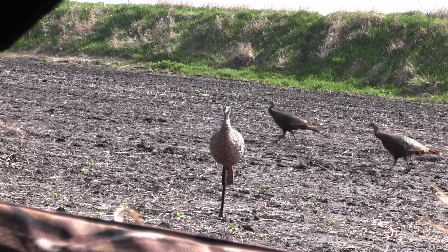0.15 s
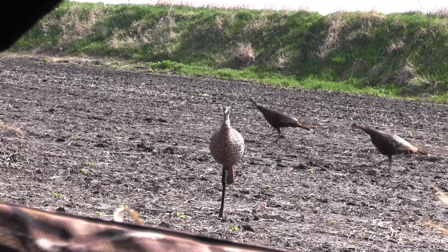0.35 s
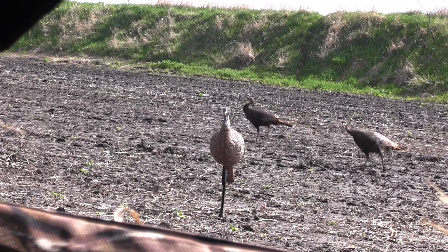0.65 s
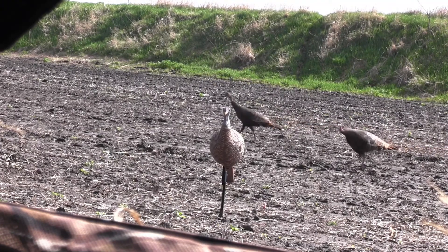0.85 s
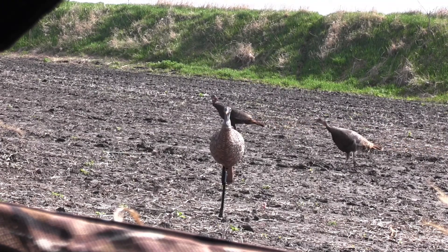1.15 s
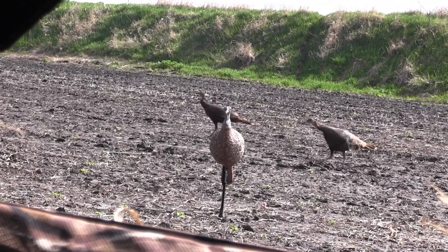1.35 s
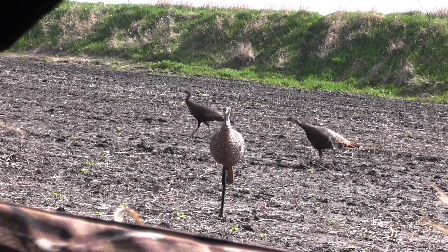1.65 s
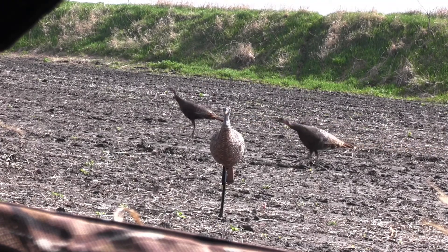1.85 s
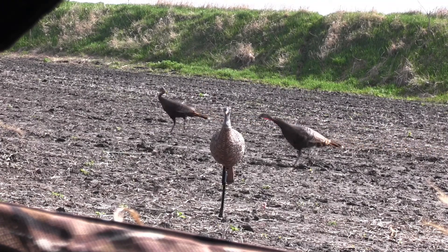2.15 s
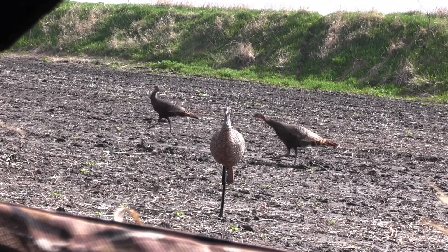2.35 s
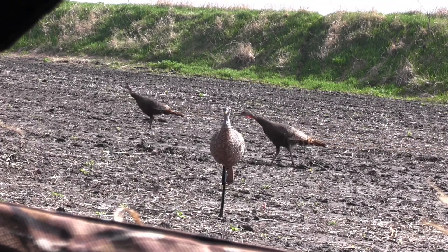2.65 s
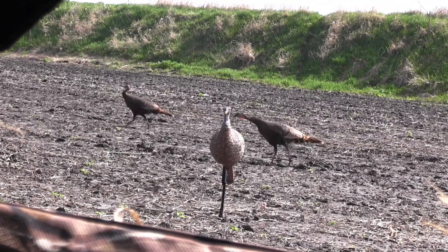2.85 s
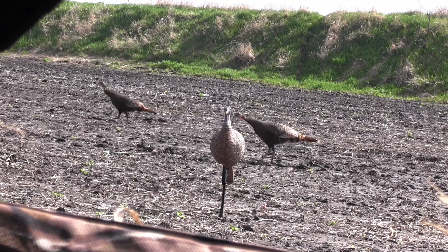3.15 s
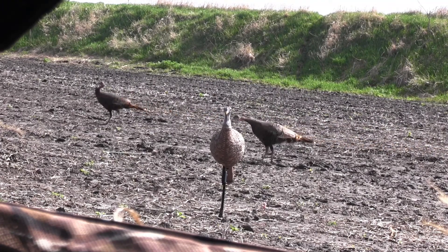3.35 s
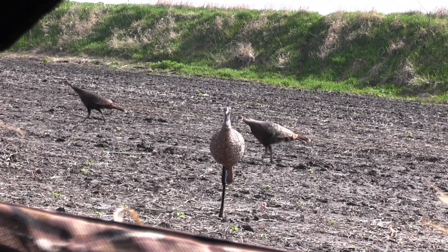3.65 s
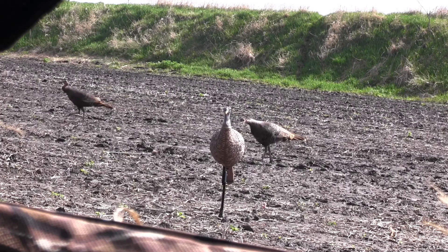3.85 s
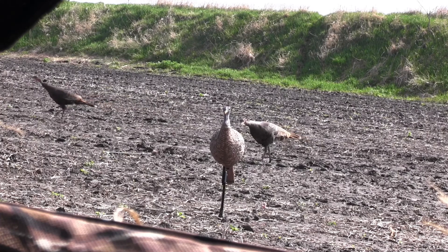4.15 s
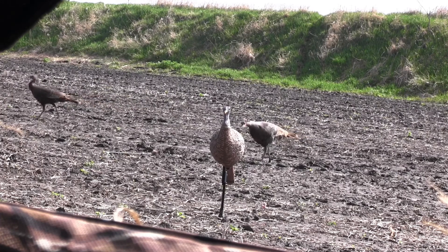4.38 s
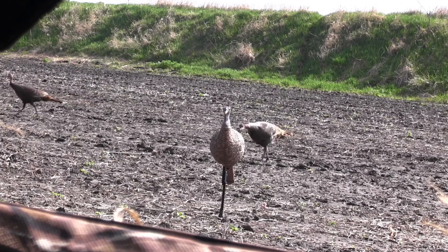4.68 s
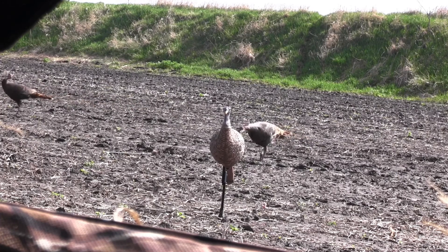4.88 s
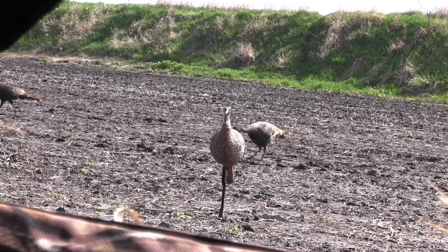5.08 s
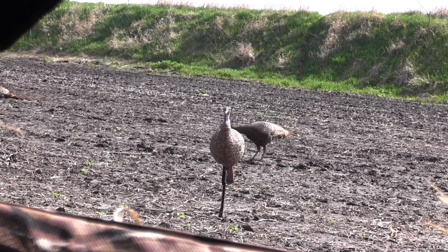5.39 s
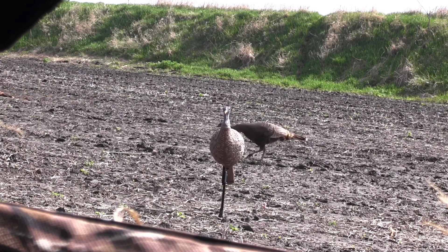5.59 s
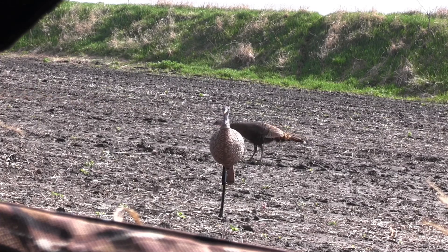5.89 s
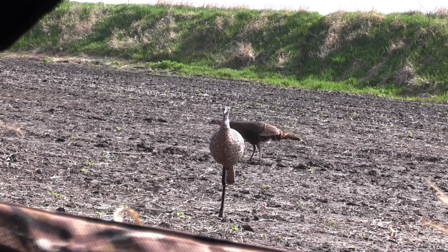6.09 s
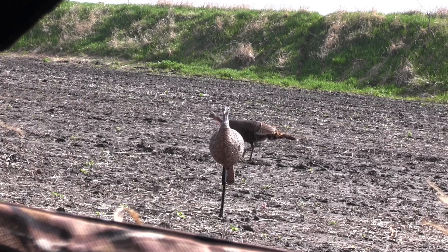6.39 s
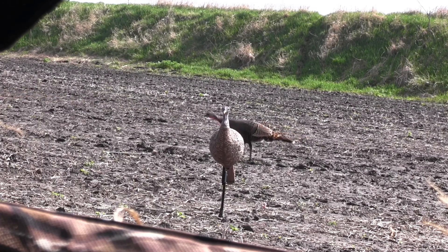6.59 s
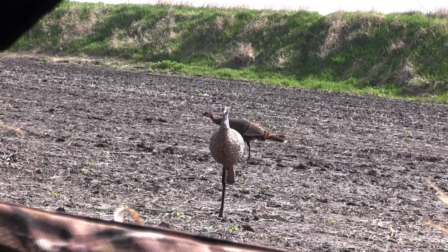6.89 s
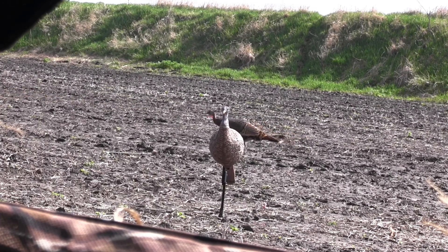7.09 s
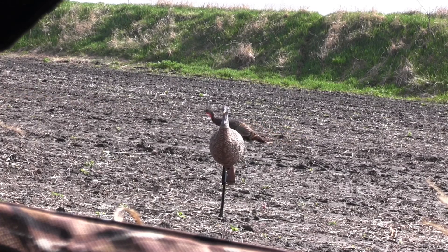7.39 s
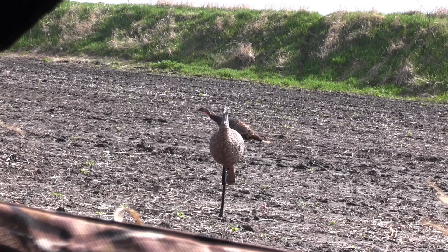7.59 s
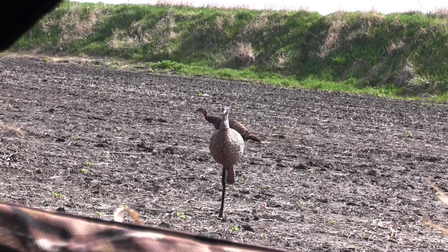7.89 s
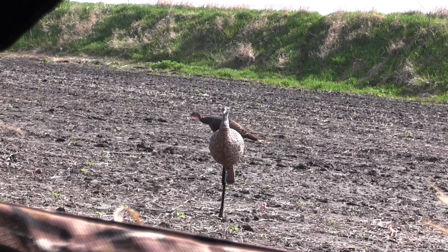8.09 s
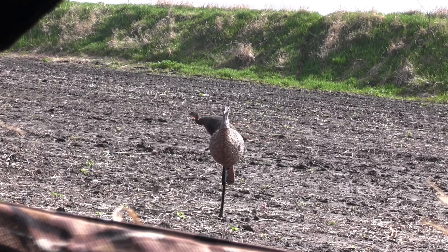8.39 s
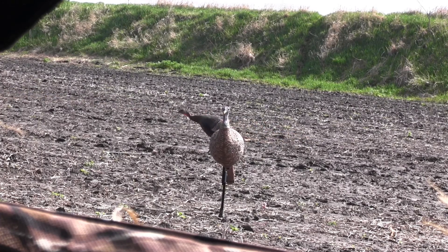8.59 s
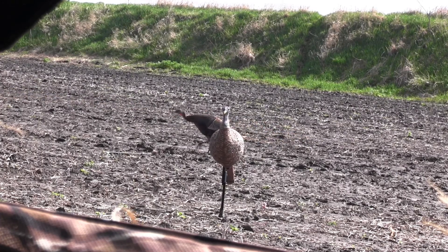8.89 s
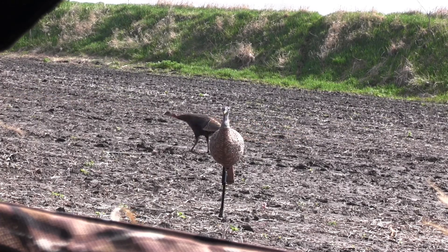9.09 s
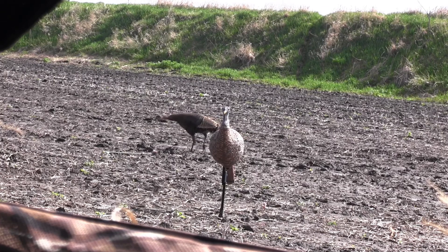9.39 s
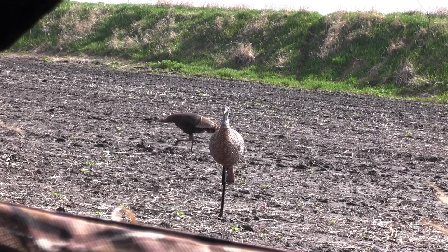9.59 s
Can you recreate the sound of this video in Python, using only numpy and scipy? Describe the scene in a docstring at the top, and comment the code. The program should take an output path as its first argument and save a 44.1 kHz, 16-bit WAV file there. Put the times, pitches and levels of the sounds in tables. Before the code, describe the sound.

For the first 5.6 seconds it is quiet inside a fabric ground blind: a low far drone swells gently, still air hisses faintly, and cloth rustles softly, most noticeably near 1.2 and 3.4 s. Small dry ticks of gear appear at 0.2, 1.6, around 2.1 and 3.35 s, with fainter dull taps from 4.4 to 5 s. At 5.6 s a close hen-turkey call begins, likely a hunter's reed: a weak, rough first yelp, a second at 5.9, then full loudness from 6.2 s. Fifteen yelps follow about 0.3 s apart, up to 9.7 s. Each opens on a thin note near 1,100 Hz, breaks quickly down to a nasal, bright tone near 700 Hz, and flips upward in a dying rasp. Breathy air leaks around the notes. A sharper tick hides among them at 8.8 s. Reflections are very short; the last yelp runs up to the end.

```python
"""Ticks of gear and a soft rustle of fabric come first, inside a ground blind, over a low, far drone.
From 5.6 s fifteen hen-turkey yelps sound close by, likely a hunter's reed call aimed at birds in the field.
Each yelp starts as a high thin note, breaks down into a full tone and ends in a rising rasp.
The yelps are summed harmonics with leaking-air noise; the ticks are decaying noise bursts.
Drone, rustle and still air are filtered noise; sparse echoes place calls and ticks between fabric walls."""
import sys
import numpy as np
from scipy import signal
from scipy.fft import rfft, irfft, next_fast_len
from scipy.io import wavfile
from scipy.ndimage import uniform_filter1d, minimum_filter1d

SR = 44100
rng = np.random.default_rng(int(sys.argv[2]) if len(sys.argv) > 2 else 0)


def wav_record(signal):
    """Record a signal, one row per channel, as 16-bit PCM in the file named by sys.argv[1]."""
    frames = np.transpose(np.atleast_2d(signal))
    bounded = np.clip(frames, -1, 1)
    # unit amplitude maps onto the largest positive 16-bit level
    quanta = np.round(bounded * 32767).astype(np.int16)
    wavfile.write(sys.argv[1], SR, quanta)


N = 429534

# Colour of the far drone: (frequency [Hz], relative level [dB])
DRONE_SPECTRUM = [(15, -48.5), (25, -17.5), (91, -4.5), (202, -10), (271, 0.5), (330, -1), (494, -13),
                  (545, -19.5), (700, -34.5), (910, -48.5), (1540, -120)]
# Swell of the drone before its trim: (time [s], level [dB])
DRONE_SWELL = [(0, -55.5), (1.1, -49.5), (2.3, -47.5), (2.85, -44.5), (3.2, -49), (4.3, -49.5), (4.7, -47),
               (5.6, -50), (6.5, -49.5), (7.2, -54.5), (8.5, -53.5), (9.74, -46.5)]
# Colour of the still air: (frequency [Hz], relative level [dB])
AIR_SPECTRUM = [(350, -27.5), (600, -1), (929, -8.5), (7430, -18.5), (13700, -23.5), (15800, -34)]
# Swell of the soft rustle before its trim: (time [s], level [dB])
RUSTLE_SWELL = [(.2, -60), (.6, -56.5), (1.25, -52.5), (1.5, -58.5), (3.15, -59), (3.4, -51), (3.95, -53.5),
                (4.25, -63.5), (5.3, -55.5), (6.5, -52), (7.7, -57.5)]
# Colour of the rustle: (frequency [Hz], relative level [dB])
RUSTLE_SPECTRUM = [(600, -2.5), (2200, 0), (3200, -7), (5500, -11), (6300, -6), (7300, -11.5),
                   (15000, -17.5)]
# Ticks and knocks of gear, levels before the trim:
# (time [s], level [dB], body colour [dB], treble colour [dB], top colour [dB])
TICK_EVENTS = [(0.166, -33, -13, -15.5, -12), (1.585, -36, -11, -21, -4), (1.594, -26.5, -10, -20.5, 6.5),
               (1.797, -43.5, -12, -20, -24), (2.091, -36.5, -10, -23, -18), (2.11, -34.5, -5.5, -16, -17),
               (2.146, -34, -16, -21, -34), (2.709, -38.5, -1, -19, -30), (2.919, -42.5, -12, -15, -3),
               (3.132, -45, -12, -22, -26), (3.353, -25, -16, -9.5, -5), (3.389, -37.5, -15, -12, -8),
               (4.432, -43, 4, -34, -40), (4.582, -42.5, -7, -28, -38), (4.656, -44, -17, -19, -14),
               (4.953, -38, 6, -48, -50), (8.767, -16.5, -11, -21.5, -22)]
# Colour all ticks share: (frequency [Hz], relative level [dB])
GEAR_SPECTRUM = [(300, -7), (850, 5.5), (1400, 0), (2050, 7), (3800, 3), (6600, 4.5), (15500, -15)]
# Reverberation of the blind: (frequency [Hz], time to fall by 60 dB [s])
BLIND_DECAY = [(300, 0.083), (10000, 0.095)]
# One row per yelp: (start [s], opening pitch [Hz], bottom of the pitch bowl [Hz], fall time [s],
# bowl bottom after start [s], hold [s], relative effort [dB], sag over the hold [dB], brightness [dB])
YELP_EVENTS = [(5.604, 926, 657.6, 0.021, 0.046, 0.071, -19, 9.5, -14.5),
               (5.901, 963, 824, 0.021, 0.045, 0.06, -5.5, -11.5, -15),
               (6.171, 991, 714, 0.0041, 0.097, 0.092, -0.5, 3, -1.9),
               (6.457, 1029, 684.5, 0.015, 0.081, 0.11, -4, -3.5, 0.5),
               (6.753, 1076, 693.7, 0.012, 0.07, 0.11, -2.5, 2.5, 0.5),
               (7.045, 1098, 674, 0.01, 0.066, 0.12, -2.5, 8.5, 3.5),
               (7.346, 1130, 726.2, 0.0082, 0.053, 0.1, -3.5, 2.6, 2),
               (7.641, 1093, 721.4, 0.01, 0.03, 0.1, -3.5, 0.3, 3),
               (7.946, 1084, 703.4, 0.0081, 0.042, 0.089, -1.5, 2.7, 4),
               (8.248, 1088, 703.2, 0.0087, 0.048, 0.092, -2.5, 4, 2.5),
               (8.546, 1118, 720, 0.0115, 0.058, 0.1, -2.5, 3, 2),
               (8.843, 1114, 701.6, 0.0088, 0.053, 0.1, -4, 3.5, 1.3),
               (9.126, 1109, 708, 0.0066, 0.056, 0.1, -3.5, 2, 3.5),
               (9.418, 1082, 710, 0.0078, 0.055, 0.1, -2.2, 5.5, -1),
               (9.707, 1042, 691.4, 0.0061, 0.053, 0.098, -5.5, -9, -0.5)]
# Mouth resonances, before their stretch: (frequency [Hz], relative level [dB])
MOUTH_RESONANCES = [(1250, -6), (1450, 5.5), (1800, 13.5), (2150, 8.5), (2400, 0), (2700, -27), (2950, -16),
                    (3400, -42.5), (4300, -53), (5200, -33), (7200, -37), (8300, -52.5), (10000, -42),
                    (12000, -59.5)]
# Strength of the fundamental by its pitch: (frequency [Hz], relative level [dB])
FUNDAMENTAL_RESPONSE = [(650, -16.5), (720, 0), (780, -5), (860, -7), (1000, -4.5), (1150, 0.5)]
# Partials lean left or right by frequency: (frequency [Hz], left minus right [dB])
SIDE_LEAN = [(680, 13.5), (730, 6.5), (800, 8.5), (920, -8.5), (1000, 13), (1355, -2), (1400, -7),
             (1450, 0), (1630, -4.5), (1820, 0), (2030, 13.5), (2120, 1.5), (2180, 6), (5500, 7.5),
             (8000, 4.5)]
# Standing waves in the blind thin out partials as they slide by: (frequency [Hz], gain [dB])
STANDING_WAVES = [(680, -2), (730, -1), (850, -7), (1000, -1.5), (1355, -1), (1395, -12), (1450, -4.5),
                  (1560, -17.5), (1820, -5), (2030, -10.5), (2120, -5.5), (2170, -6.5), (2230, -5),
                  (2400, -6.5), (3000, -8.5), (7000, -4.5)]
# Air leaking past the reed, with a whistly resonance, before its stretch:
# (frequency [Hz], relative level [dB])
LEAK_SPECTRUM = [(700, -26), (2600, 11.5), (3900, -23.5), (5600, -17.5), (6900, -7), (7450, 8.5),
                 (8200, -12.5), (10000, -17), (12000, -28.5)]
# In the first yelps the reed swings strong and weak in turn, adding half tones: (time [s], depth [0-1])
DOUBLING_DEPTH = [(5.6, 0), (5.64, 0.9), (5.89, 0.063), (5.92, 0.028), (5.965, 0.4), (6.18, 0.14),
                  (6.21, 0), (6.25, .03)]
# Now and then the reed stumbles in mid-yelp: (time [s], length [s], dip [dB], roughness [0-1])
STUMBLE_EVENTS = [(6.222, 0.02, 9, 0.4), (6.538, 0.028, 9.5, 0.05), (6.83, .015, 8, .05),
                  (7.721, 0.0085, 4, 0.31)]
# Bolder calling changes the leak and sinks its whistle:
# (time [s], leak before effort [dB], stretch of the leak's spectrum [factor], highest partials [dB])
BOLDNESS_STAGES = [(5.6, -58, 1.25, -13.5), (6.2, -44.5, 1.3, -4), (6.6, -48, 1.05, 2.5),
                   (7.4, -41, 1.007, 2.5), (9.4, -43.5, 0.96, -1)]

EDGE_HZ = 15850  # top of the audible band
# Pitch: the opening note falls into a shallow bowl, then flips back up as the pressure is let go
BOWL_HZ_PER_S2 = 25000
FLIP_SHARE = .91  # of the opening pitch
FLIP_AFTER_S, FLIP_S = .011, 0.0081
# An opening note above this pitch glides only part of the way, then breaks to the full tone
BREAK_ABOVE_HZ, BREAK_S = 1055, 0.0011
BREAK_AT_FALLS, BREAK_SHARE, GLIDE_FALLS = 1.7, .75, 1.9  # times in units of the fall time
THIN_DB = -10.5  # the opening note has little fundamental
# Effort: a quick swell, a sagging hold, a drop at the release and a dying rasp
SWELL_DB_PER_S, LEAD_S = 4301.5, .012
DROP_DB, DROP_S = 19, .014
RASP_S, FADE_DB_PER_S, TAIL_S = .02, 859.5, .08
# Late in the hold the reed stops beating hard, and the yelp loses its brightness
DULL_AT_SHARE, DULL_OVER_SHARE = 0.66, 0.024
DULL_DB, DULL_TREBLE_DB = 11.5, 18
# The mouth starts out tighter and opens with boldness, by this power of the leak's stretch
MOUTH_STRETCH_POWER = 0.2
ROUGHNESS_HZ = 260  # speed of the reed's irregular wavering


def gain_of(db):
    """Turns decibels into amplitude."""
    return 10 ** (np.asarray(db) / 20)


def evened(x):
    """Scales a sound to rms 1."""
    return x / np.sqrt(np.mean(x ** 2) + 1e-20)


def read(points, hz):
    """Reads a table along a log-frequency axis."""
    f, value = np.transpose(points)
    return np.interp(np.log(hz + 1), np.log(f + 1), value)


def level(curve):
    """Turns a dB curve over time into a gain for every sample."""
    return gain_of(np.interp(np.arange(N) / SR, *np.transpose(curve)))


def step(t, width):
    """Steps smoothly from 0 to 1 around t = 0."""
    return .5 + .5 * np.tanh(t / width)


def add(mix, s, sound):
    """Mixes a stereo sound in at time s."""
    part = mix[:, round(s * SR):][:, :sound.shape[1]]
    part += sound[:, :part.shape[1]]


def colour(x, spectrum):
    """Filters a sound by a spectrum in dB."""
    size = x.shape[-1]
    gain = gain_of(read(spectrum, np.fft.rfftfreq(size, 1 / SR)))
    return irfft(rfft(x) * gain, size)


def wander(size, hz):
    """Smooth random motion of rms near 1: noise that falls off steeply above hz."""
    n = next_fast_len(size)
    rolloff = 1 + (np.fft.rfftfreq(n, 1 / SR) / hz) ** 4
    return evened(irfft(rfft(rng.standard_normal(n)) / rolloff, n)[:size])


def noise_pair(spectrum, side_db, size):
    """Coloured stereo noise: a common middle plus a quieter part of opposite sign left and right."""
    noise = rng.standard_normal((2, next_fast_len(size)))
    mid, side = colour(noise, spectrum)[:, :size]
    return evened(mid + gain_of(side_db) * np.array([side, -side]))


def far_drone(drone_db=1.0, rumble_db=-48):
    """A far drone of filtered noise swells and sinks; its rumble follows half as far in dB."""
    noise = noise_pair(DRONE_SPECTRUM, -16, size=N)
    rumble = signal.sosfiltfilt(signal.butter(2, 170, fs=SR, output="sos"), noise)
    swell = level(DRONE_SWELL)
    drone = gain_of(drone_db + 2 * wander(N, 12.0)) * swell * (noise - rumble)
    return drone + gain_of(rumble_db) * evened(np.sqrt(swell)) * rumble


def soft_rustle(rustle_db=-1, uneven_db=2.0):
    """Fabric rustles as filtered noise whose level wavers at random."""
    uneven = gain_of(rustle_db + uneven_db * wander(N, 10))
    return level(RUSTLE_SWELL) * uneven * noise_pair(RUSTLE_SPECTRUM, -3.5, size=N)


def still_air(air_db=-59):
    """Still air is a steady, faint hiss of filtered noise."""
    return gain_of(air_db) * noise_pair(AIR_SPECTRUM, -10, size=N)


def blind(x):
    """Fabric walls close by return a short tail of sparse reflections, different in each channel."""
    size = SR // 4
    signs = rng.choice([-1., 1.], (2, size))
    sparse = rng.random((2, size)) < 3000 / SR  # about 3000 reflections per second
    taps = signs * sparse * (np.arange(size) > .004 * SR)
    # each frequency dies at its own rate
    hz, t, z = signal.stft(taps, SR, nperseg=128)
    decay = gain_of(-60 * t / read(BLIND_DECAY, hz)[:, None])
    tail = signal.istft(z * decay, SR, nperseg=128)[1]
    tail = tail / np.linalg.norm(tail, axis=1, keepdims=True)
    return signal.oaconvolve(x, tail, axes=1)[:, :N]


def ticks(trim_db=-5, t60=0.086):
    """Each tick of gear is a noise burst with a sharp front, dull or bright, that dies quickly."""
    out = np.zeros((2, N))
    t = np.arange(SR // 5) / SR
    for s, db, body_db, treble_db, top_db in TICK_EVENTS:
        middle_db = (treble_db + top_db) / 2
        tint = [(1800, body_db), (6000, treble_db), (11000, middle_db), (15000, top_db)]
        burst = colour(noise_pair(GEAR_SPECTRUM, -5.5, size=len(t)), tint)
        add(out, s, evened(burst) * gain_of(db + trim_db - 60 * t / t60))
    return out


def opening(t, top_hz, fall_s, steepness=1.5):
    """How much of the high opening note is left, 1 to 0: a low one slides down, a high one breaks."""
    falls = np.maximum(t, 0) / fall_s
    if top_hz > BREAK_ABOVE_HZ:
        broken = step(t - BREAK_AT_FALLS * fall_s, BREAK_S)
        return np.exp(-falls / GLIDE_FALLS) * (1 - BREAK_SHARE * broken)
    return np.exp(-falls ** steepness)


def reed_pitch(t, high, top_hz, low_hz, bottom_s, hold_s):
    """The high note gives way to the full tone, which bends gently and flips up at the release."""
    bowl = low_hz + BOWL_HZ_PER_S2 * (t - bottom_s) ** 2
    hz = bowl + (top_hz - bowl) * high
    return hz + (FLIP_SHARE * top_hz - hz) * step(t - hold_s - FLIP_AFTER_S, FLIP_S)


def effort(t, hold_s, sag_db):
    """Swell, hold, drop and fade of one yelp's blowing effort, in dB."""
    held = SWELL_DB_PER_S * np.minimum(t, 0) - sag_db * np.clip(t / hold_s, 0, 1)
    fade = FADE_DB_PER_S * np.maximum(t - hold_s - RASP_S, 0)
    return held - DROP_DB * step(t - hold_s, DROP_S) - fade


def stumbling(s):
    """The dip in dB and the roughness that the reed's stumbles bring at times s."""
    at, length, dip_db, rough = np.transpose(STUMBLE_EVENTS)
    near = np.exp(-((s[:, None] - at) / length) ** 2)
    return near @ dip_db, near @ rough


def partial_heights(order, hz, db, high, dull, slide, bright_db, stretch, highs_db, knee_db=-19):
    """Amplitudes of the reed's harmonics, shaped by the mouth and by standing waves in the blind."""
    partial_hz = order * hz
    mouth_db = read(MOUTH_RESONANCES, partial_hz / stretch ** MOUTH_STRETCH_POWER)
    # brightness acts most on the third partial and less on each one above
    share = np.where(order > 2, gain_of(-4. * (order - 3)), 0)
    height = gain_of(mouth_db + share * (bright_db - DULL_DB * dull))
    height *= (order > 1) * (partial_hz < EDGE_HZ)
    height *= gain_of(db) / np.linalg.norm(height, axis=0)
    # the fifth partial and up weaken while the reed slides, and as it dulls
    height[4:] *= (1 - 0.5 * slide) * gain_of(highs_db - DULL_TREBLE_DB * dull)
    # the fundamental stops growing once the reed beats: more pressure only feeds the overtones
    fundamental = gain_of(db + read(FUNDAMENTAL_RESPONSE, hz) + THIN_DB * high)
    height[0] = fundamental / np.hypot(1, gain_of(db - knee_db))
    return height * gain_of(read(STANDING_WAVES, partial_hz))


def yelp(start, top_hz, low_hz, fall_s, bottom_s, hold_s, effort_db, sag_db, bright_db,
         unsettled=0.38, slack_rasp=1.0, firm_db=-18, lead_rad=.56, slide_leak=2.0, dull_leak_db=-3):
    """A reed's harmonics pass the mouth; it runs clean when settled, rough while it slides or is slack."""
    t = np.arange(-LEAD_S, hold_s + TAIL_S, 1 / SR)
    high = opening(t, top_hz, fall_s)
    hz = reed_pitch(t, high, top_hz, low_hz, bottom_s, hold_s)
    dip_db, stumble = stumbling(start + t)
    db = effort_db + effort(t, hold_s, sag_db) - dip_db
    # states of the reed, each from 0 to 1
    dull = step(t / hold_s - DULL_AT_SHARE, DULL_OVER_SHARE)
    slack = 1 / (1 + gain_of(db - effort_db - firm_db) ** 2)
    pitch_speed = uniform_filter1d(abs(np.gradient(np.log(hz), t)), size=500)
    slide = np.tanh(pitch_speed / 12) ** 2
    jitter = .001 + .014 * slide + .012 * slack + .012 * stumble
    hz = hz * (1 + jitter * wander(len(t), ROUGHNESS_HZ))

    stage_s, *stages = np.transpose(BOLDNESS_STAGES)
    leak_db, stretch, highs_db = (np.interp(start, stage_s, column) for column in stages)
    order = np.arange(1, 21)[:, None]
    height = partial_heights(order, hz, db, high, dull, slide, bright_db, stretch, highs_db)
    turns = np.cumsum(hz) / SR
    side = np.array([1, -1])[:, None, None]  # left, right
    pan = np.sqrt(2 / (1 + gain_of(-2 * side * read(SIDE_LEAN, order * hz))))
    # the overtones run ahead in phase on the left
    phase = 2 * np.pi * order * turns + side * (order > 1) * lead_rad / 2
    partials = np.sqrt(2) * pan * height * np.cos(phase)

    roughness = unsettled * slide + slack_rasp * slack + stumble
    rasp = roughness * wander(len(t), ROUGHNESS_HZ)
    # half the reed's rate: strong and weak swings in turn
    doubling = np.interp(start + t, *np.transpose(DOUBLING_DEPTH)) * np.cos(np.pi * turns)
    overtones = partials[:, 1:].sum(1) * (1 + rasp + doubling)
    tone = partials[:, 0] * (1 + rasp * slack / 2) + overtones

    # sliding lets more air leak
    air = noise_pair(np.multiply(LEAK_SPECTRUM, (stretch, 1)), -9.5, size=len(t))
    leak = gain_of(leak_db + db / 2 + dull_leak_db * dull) * (1 + slide_leak * slide) * air
    return start + t[0], (tone + leak) * signal.windows.tukey(len(t), .04)


def yelps():
    """The whole run of reed calls, one after another."""
    out = np.zeros((2, N))
    for row in YELP_EVENTS:
        add(out, *yelp(*row))
    return out


def scene(yelps_db=1.5, blind_db=-7.5):
    """Calls and ticks with their reflections inside the blind, over drone, rustle and still air."""
    background = far_drone() + soft_rustle() + still_air()
    near = gain_of(yelps_db) * yelps() + ticks()
    return near + gain_of(blind_db) * blind(near) + background


def record(dry, ceiling=1.0, squash=0.1):
    """A fast limiter holds peaks down, a cubic curve rounds the loudest, a low-pass limits the band."""
    allowed = minimum_filter1d(np.minimum(1, ceiling / (abs(dry) + 1e-9)), size=260)
    smooth_gain = uniform_filter1d(uniform_filter1d(allowed, size=130), size=130)
    held = dry * smooth_gain
    rounded = held - squash * held ** 3
    low_pass = signal.firwin(511, EDGE_HZ, window=("kaiser", 9), fs=SR)
    return signal.oaconvolve(rounded, low_pass[None], "same")


dry = scene()
out = record(dry)
wav_record(out)
```